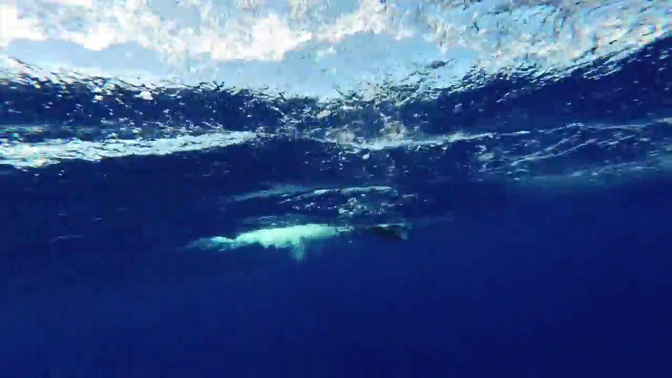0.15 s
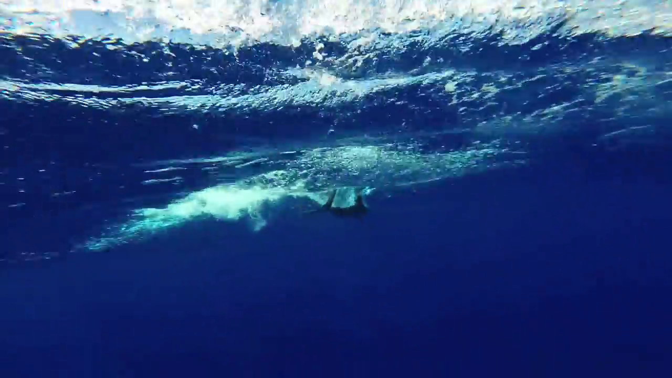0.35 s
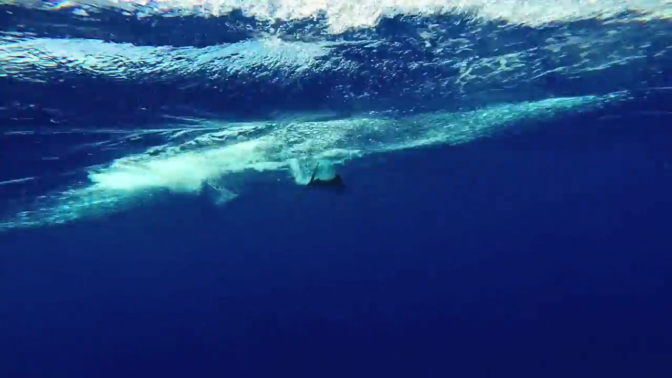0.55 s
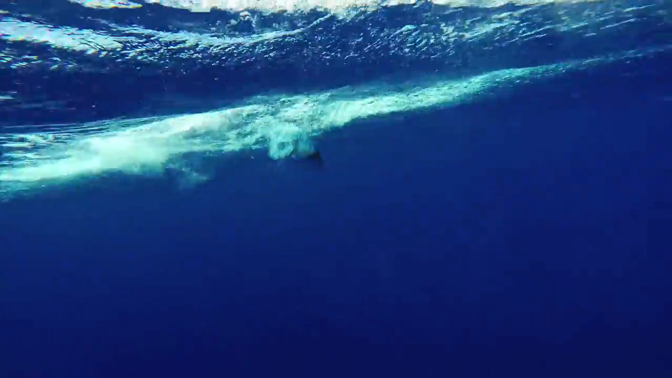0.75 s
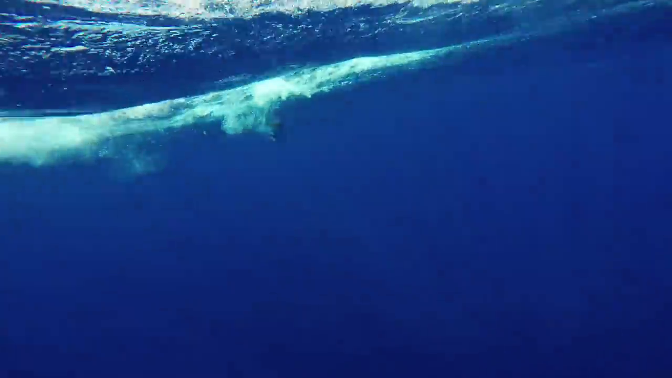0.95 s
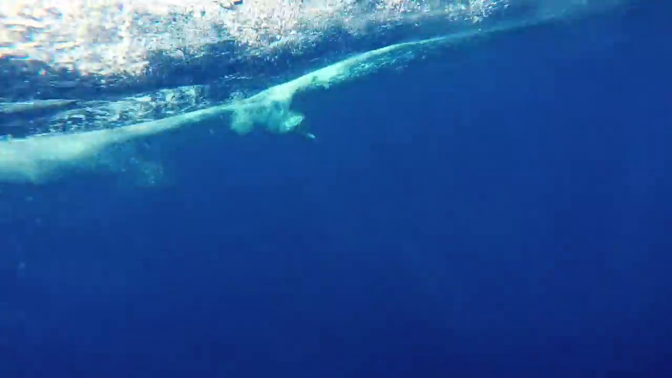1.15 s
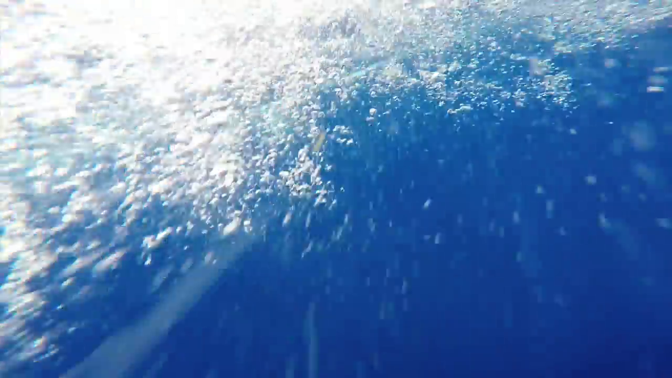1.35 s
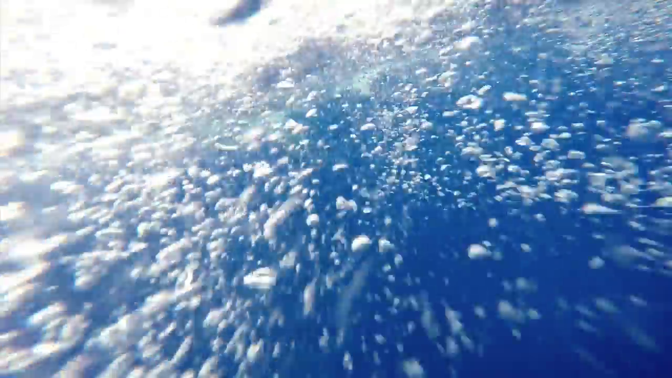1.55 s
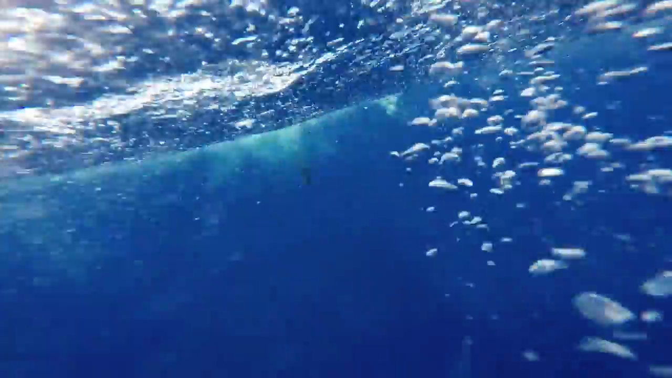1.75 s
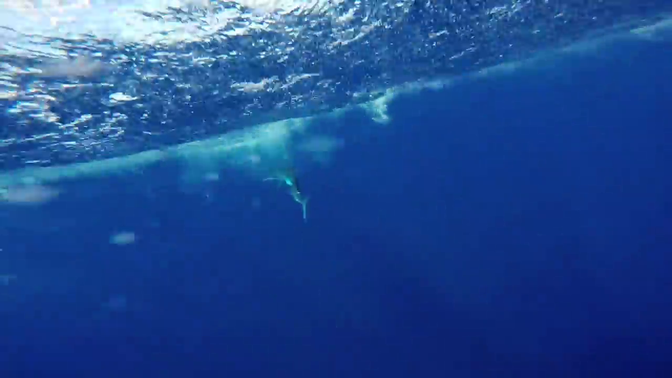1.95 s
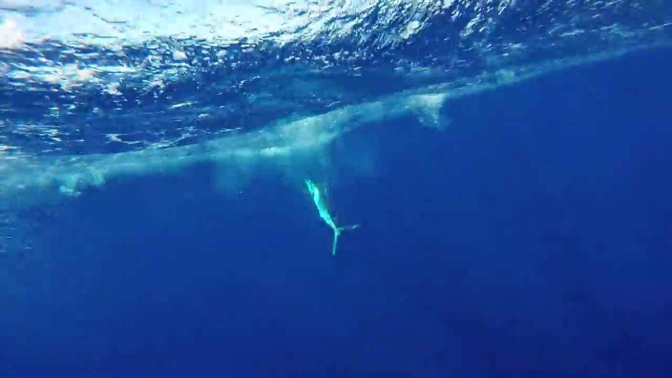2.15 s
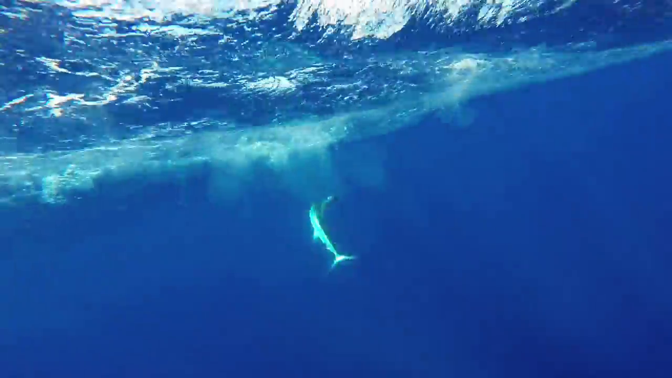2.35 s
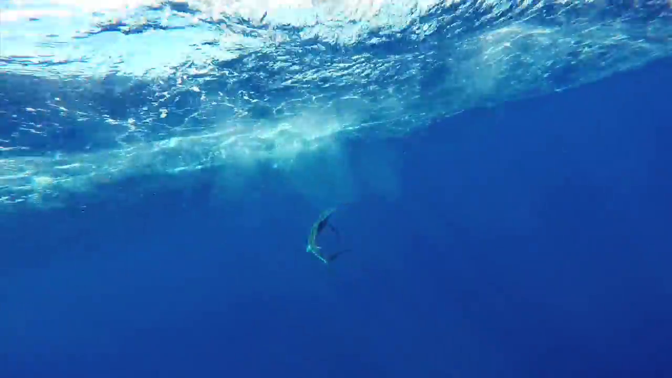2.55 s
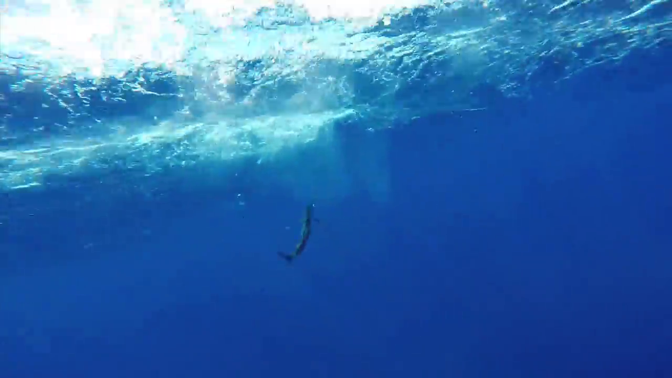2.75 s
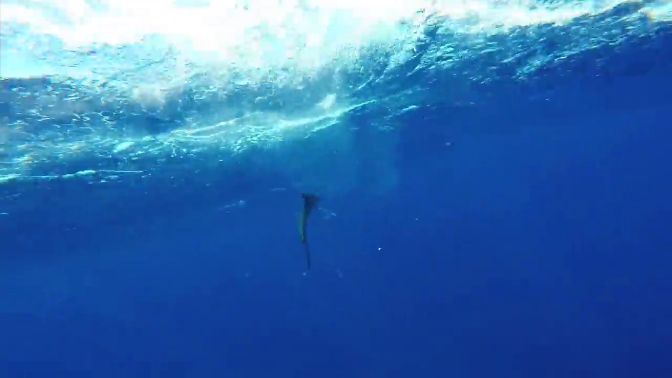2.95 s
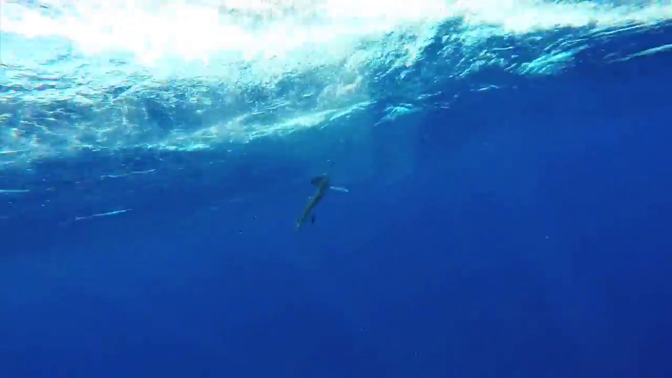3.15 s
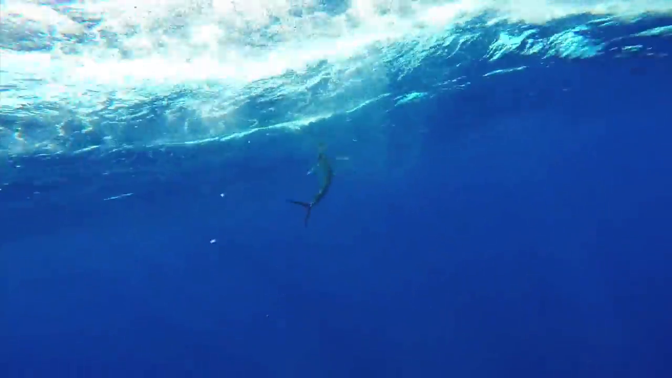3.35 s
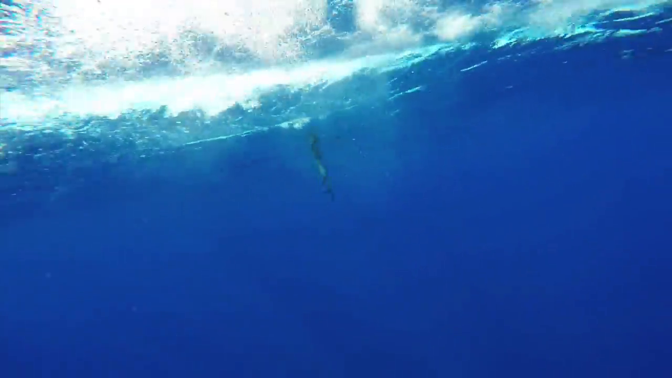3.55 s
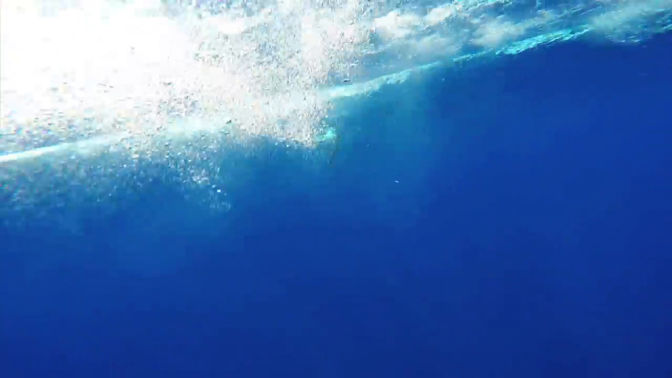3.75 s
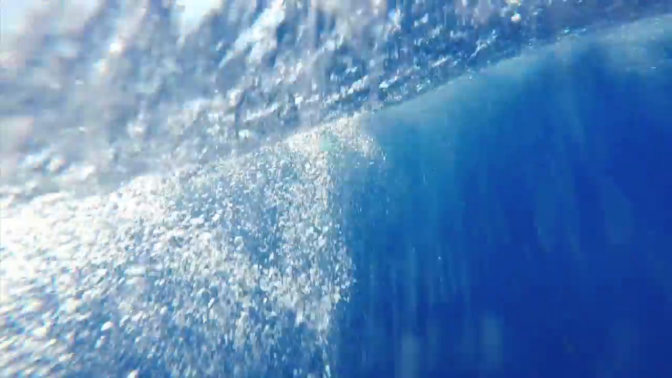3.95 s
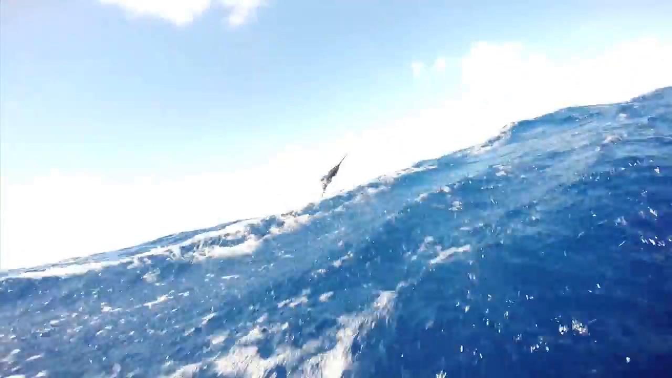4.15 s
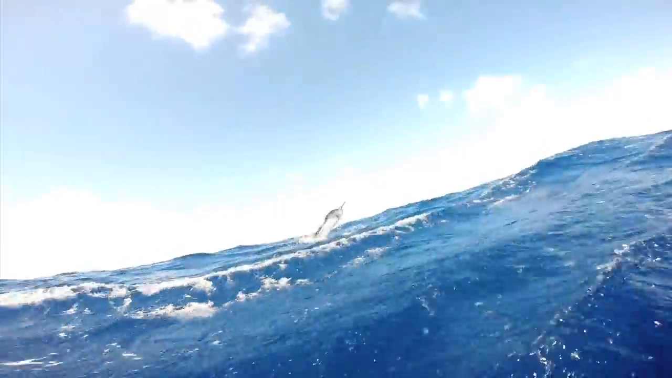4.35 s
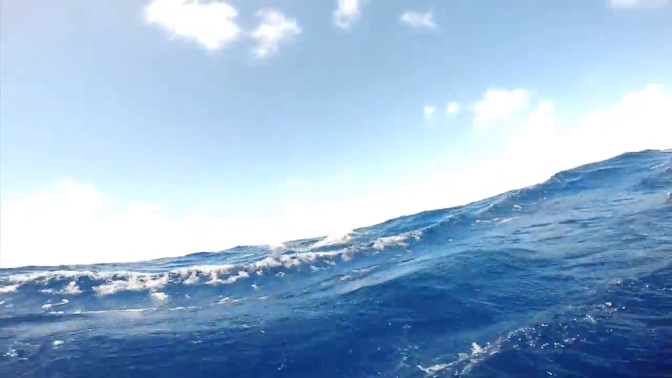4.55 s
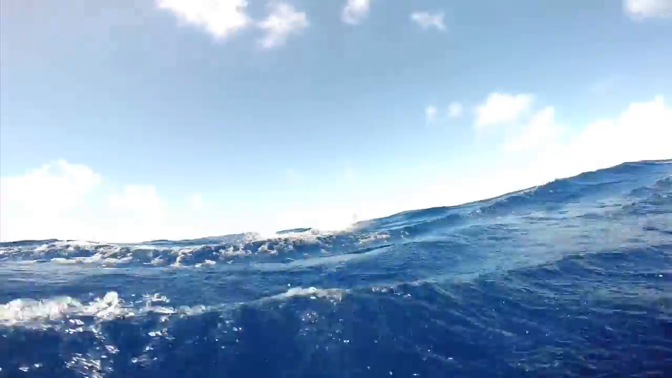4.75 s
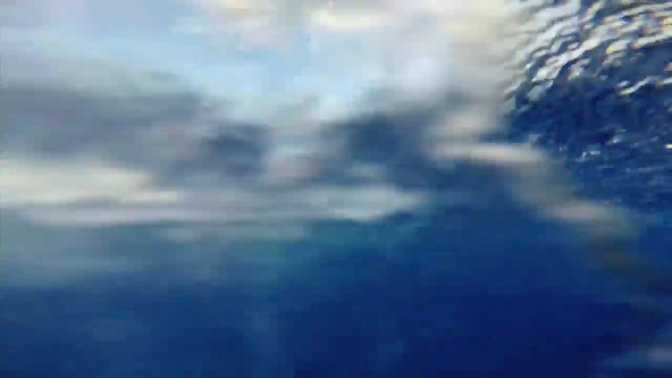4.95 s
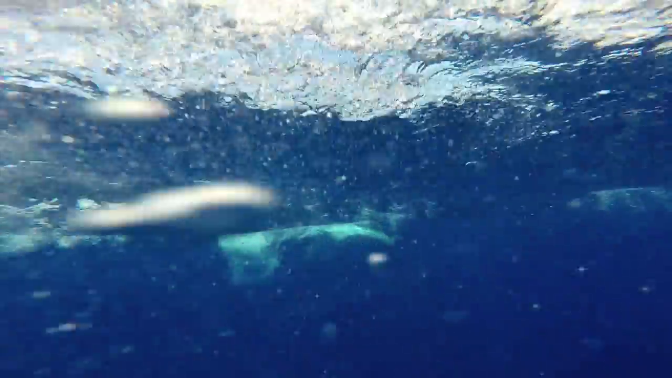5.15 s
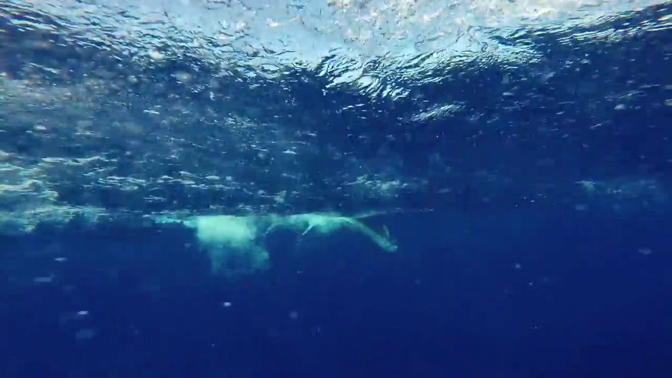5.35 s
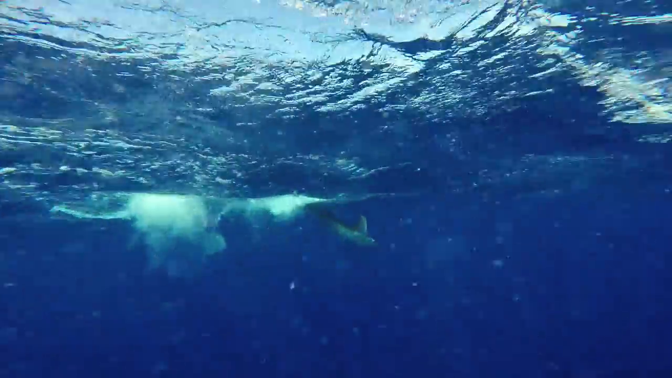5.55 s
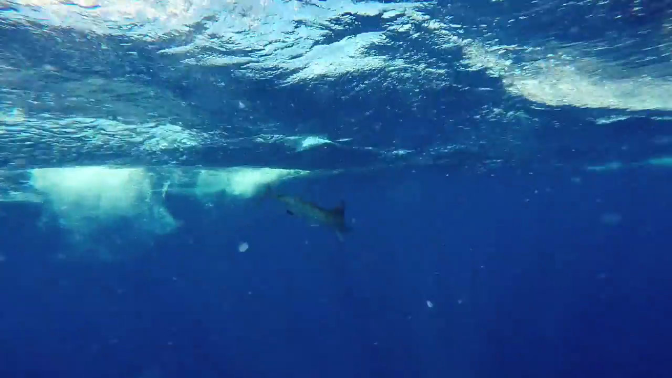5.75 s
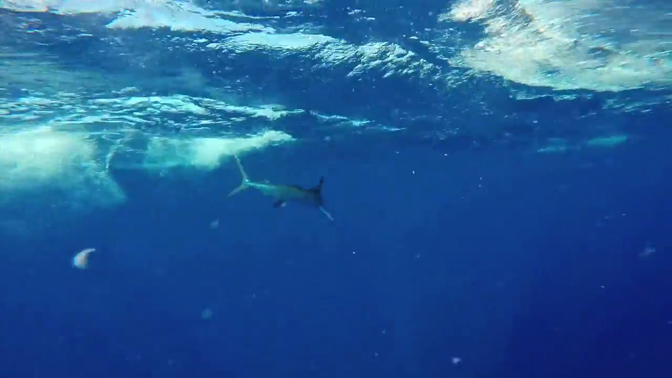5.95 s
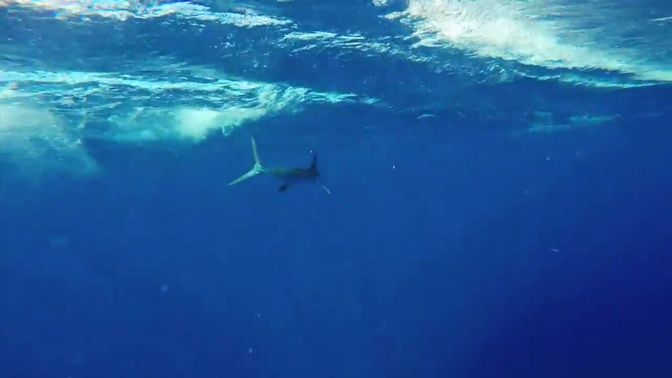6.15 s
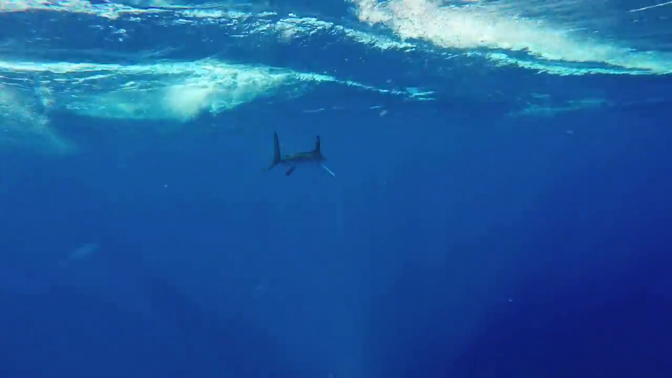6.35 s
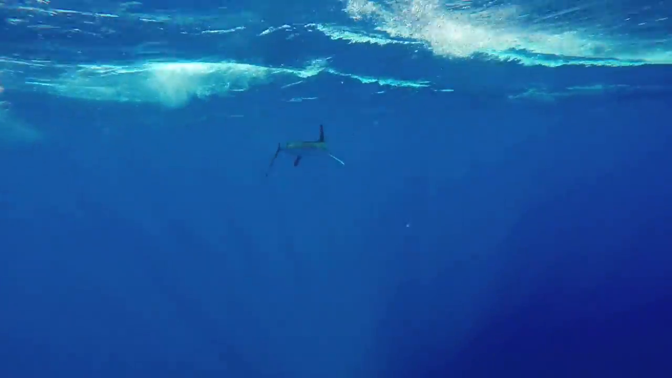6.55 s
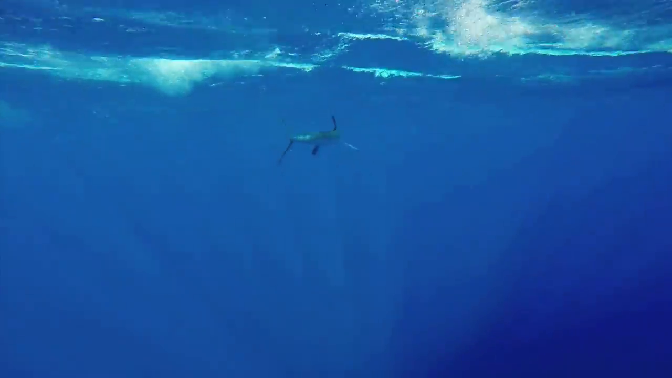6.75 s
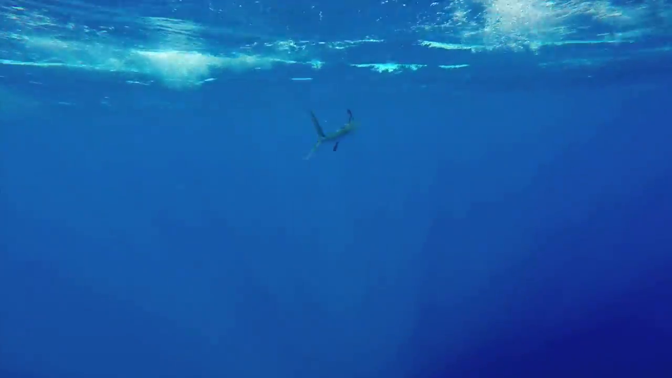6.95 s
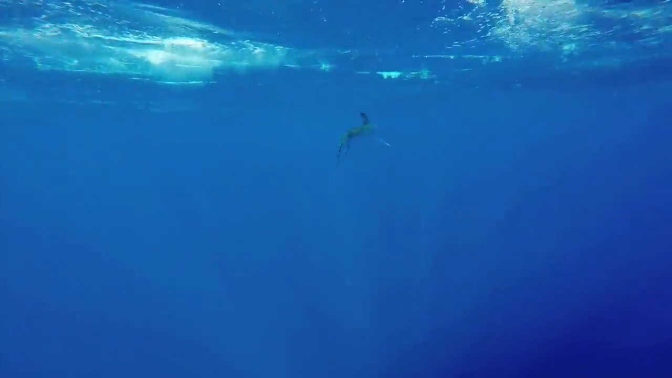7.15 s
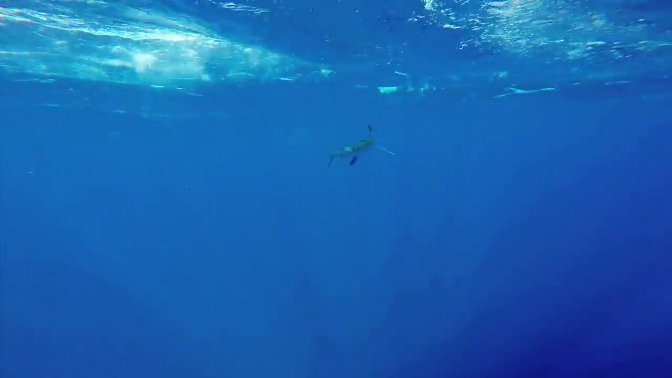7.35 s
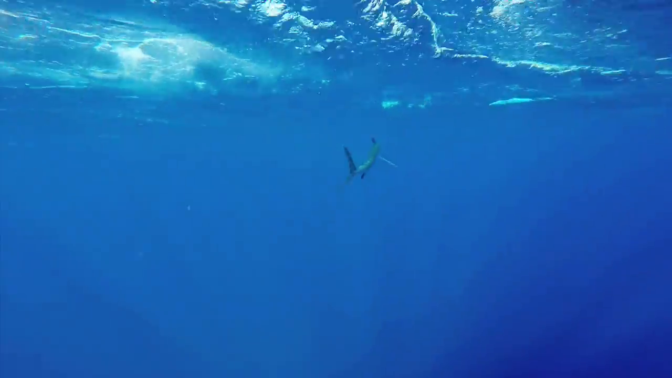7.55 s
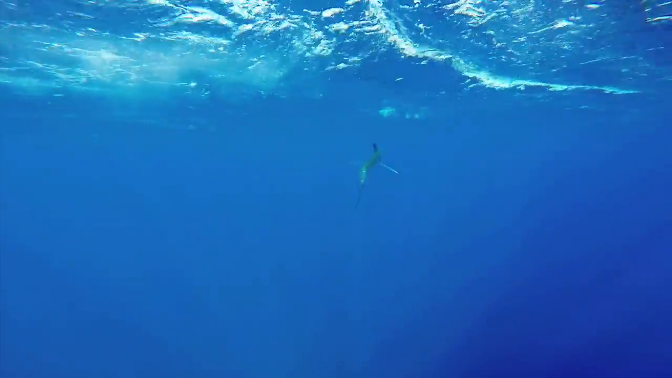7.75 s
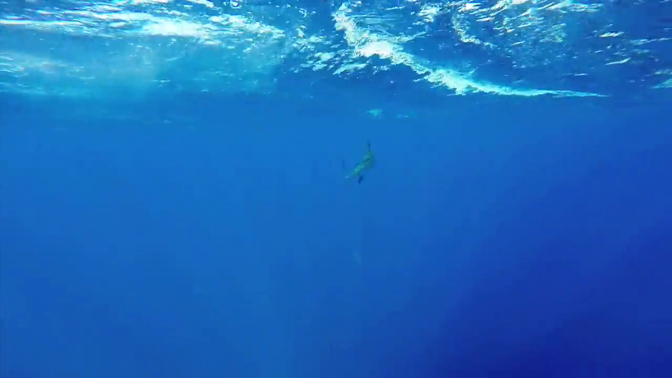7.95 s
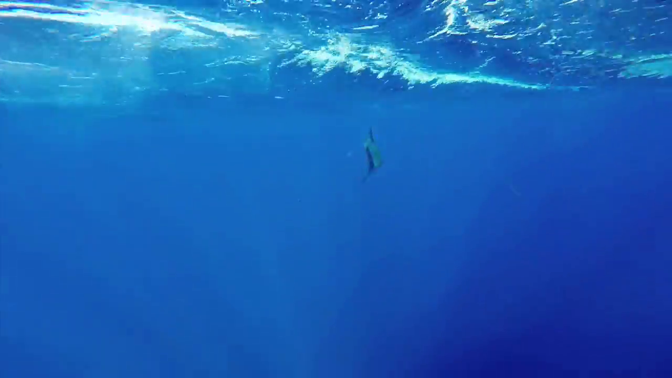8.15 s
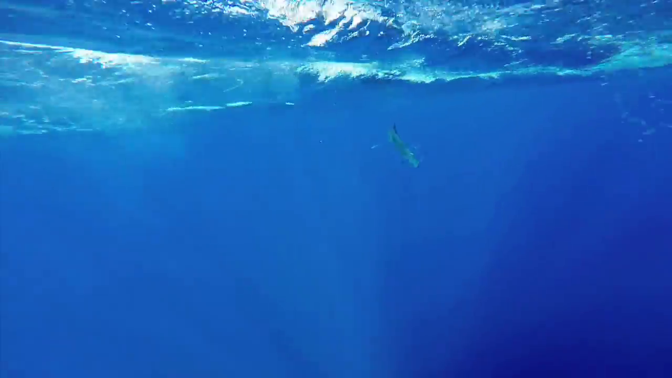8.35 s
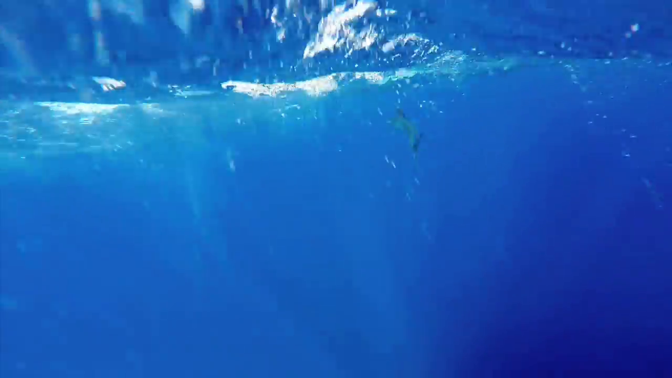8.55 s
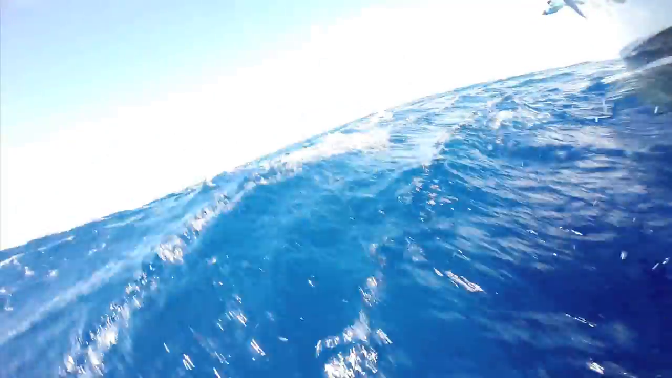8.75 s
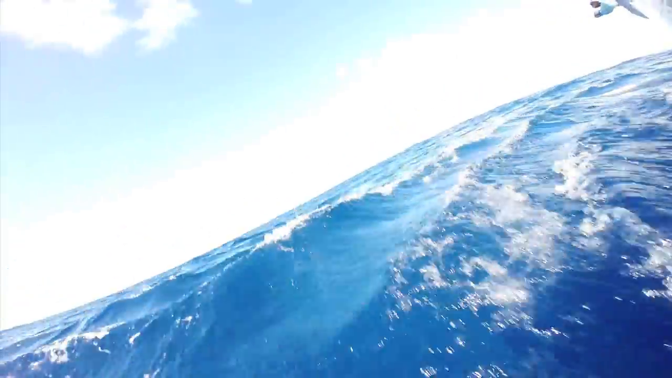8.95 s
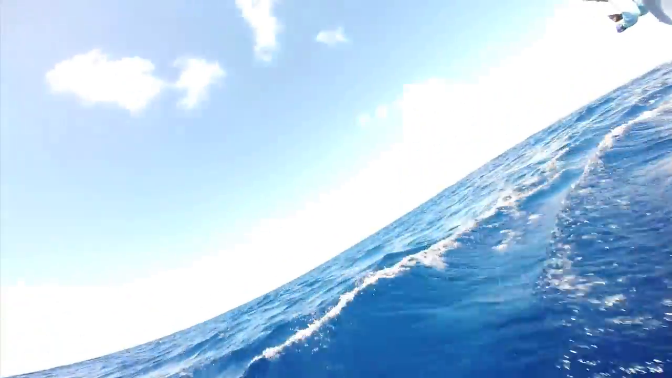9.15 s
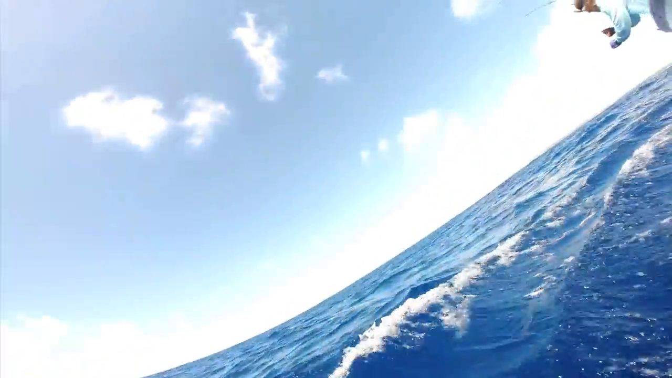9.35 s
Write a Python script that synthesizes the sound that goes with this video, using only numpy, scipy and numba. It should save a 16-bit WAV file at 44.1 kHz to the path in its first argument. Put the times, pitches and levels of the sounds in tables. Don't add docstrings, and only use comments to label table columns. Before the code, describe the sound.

Bubbly seawater churns close against a sealed housing, a hard plunge thumps, a long muffled rush builds, then a snap leaves faint wind.

```python
import sys
import numpy as np
from scipy import signal
from scipy.fft import rfft, irfft, next_fast_len
from scipy.io import wavfile
from scipy.ndimage import uniform_filter1d
from numba import njit

SR = 44100
rng = np.random.default_rng(int(sys.argv[2]) if len(sys.argv) > 2 else 0)


def transcribe(u):
    v = np.clip(np.atleast_2d(u).T, -1, 1)
    q = np.round(v * 32767).astype(np.int16)
    wavfile.write(sys.argv[1], SR, q)


def makeup_ratio(level_db):
    decades = np.asarray(level_db, float) / 20
    return 10 ** decades


N = 415422
TIME = np.arange(N) / SR
SLOW_TIME = TIME[::64]


def curve(table):
    s, *columns = np.transpose(table)
    return [np.interp(SLOW_TIME, s, c) for c in columns]


def full(slow):
    return np.interp(TIME, SLOW_TIME, slow)


def walk(rate):
    size, hold = len(SLOW_TIME), max(int(SR / 64 / rate), 1)
    steps = np.repeat(rng.standard_normal(size), hold)[:size]
    return 1.585 * uniform_filter1d(uniform_filter1d(steps, hold), hold)


def colour(table, hz):
    f, db = np.transpose(table)
    return np.interp(np.log(hz), np.log(f), db)


@njit
def ring(start, hz, size, t60, rise, swell):
    out = np.zeros(N)
    for k in range(len(hz)):
        n = int(t60[k] * SR) + 2
        phase, gain, fade, shut = 0., size[k], 1000 ** (-1 / n), 1.
        close = np.exp(-1 / (swell * n))
        for i in range(min(n, N - start[k])):
            phase += 2 * np.pi * hz[k] * (1 + rise * i / n) / SR
            shut *= close
            out[start[k] + i] += gain * (1 - shut) ** 2 * np.sin(phase)
            gain *= fade
    return out


def hits(table, lift_db, t60, rise, swell):
    s, db, hz = np.transpose(table)[:3]
    late, twin = rng.random((len(s), 2)).T
    first = ring((s * SR).astype(int), hz, makeup_ratio(db + lift_db), t60, rise, swell)
    twin_start = ((s + 0.00069 * late) * SR).astype(int)
    twin_hz = hz * (1.06 + 0.22 * twin)
    return first + ring(twin_start, twin_hz, makeup_ratio(db + lift_db - 13.5), 1.26 * t60, rise, swell)


BAND_EDGES = [25, 150, 900, 2400, 9000]


def lifted(table, levels_db, hz):
    group = np.clip(np.searchsorted(BAND_EDGES, hz) - 1, 0, len(BAND_EDGES) - 2)
    centres = np.log([70, 400, 1500, 3500])
    share = np.array([np.interp(np.log(hz), centres, row) for row in np.eye(4)]).T
    db = colour(table, hz) + 10 * np.log10(hz)
    own = [10 * np.log10(np.sum(makeup_ratio(db[group == g]) ** 2)) for g in range(4)]
    return (db - share @ own)[:, None] + share @ levels_db


# time in seconds, share in air 0-1.
AIR_SHARE = [(0, 0.55), (4.05, 0.41), (4.15, 1), (4.92, 0.8), (4.98, 0.04), (8.58, 0), (8.66, 1),
             (9.42, 0.48)]


def air_share():
    return curve(AIR_SHARE)[0]


# frequency in Hz, level in dB per Hz.
AIR_SPECTRUM = [(18, -61), (30, 2), (114, -2.5), (249, -24), (1170, -27), (1550, -24), (2240, -30),
                (5300, -43), (13000, -61), (15500, -76)]
WIND_LEVELS = [-47.5, -54, -55, -52.5]


def wind_power(hz):
    wind_db = lifted(AIR_SPECTRUM, np.array(WIND_LEVELS)[:, None], hz)
    return makeup_ratio(wind_db) ** 2 * np.clip(air_share(), 0, 1) ** 1.74


# time in seconds, pitch in Hz, level in dB.
HULL_TONE = [(0, 116, -65), (1.9, 113, -94), (2.1, 109.3, -28), (2.8, 116.6, -37), (3.0, 115.1, -37),
             (3.5, 116.7, -39), (4.0, 115, -46), (4.8, 114.8, -51.5), (6.2, 113.7, -42.5),
             (8.6, 109.6, -45), (9.42, 112.2, -45)]


def hull():
    hz, db = curve(HULL_TONE)
    phase = 2 * np.pi * np.cumsum(full(hz * (1 + .055 * walk(18)))) / SR
    return np.sin(phase) * full(makeup_ratio(db + 4 * walk(14) - 2))


# time in seconds, level in dB, build in seconds, recovery in seconds.
FILM_POPS = [
    (1.8365, 0, .0005, .0005),
    (8.5755, -1, 0.0021, 0.0011),
    (8.5903, 2.5, 0.00089, 0.0005),
    (8.605, -23, .002, .003),
]


def pops():
    out = np.zeros(N)
    for s, db, build, recover in FILM_POPS:
        t = TIME - s
        before = .8 * np.exp(-abs(t) / build)
        after = -1.45 * np.exp(-abs(t) / recover)
        out += makeup_ratio(db) * np.where(t < 0, before, after)
    return uniform_filter1d(uniform_filter1d(out, size=24), size=24)


# time in seconds, peak in dB.
FILM_CRACKS = [(0.0423, -44), (0.0598, -41), (0.0952, -40), (1.1443, -41), (1.1697, -38), (1.4641, -42),
               (1.4835, -44), (1.4955, -36), (1.5264, -38), (1.5394, -33), (1.6217, -44), (1.6591, -29),
               (1.6781, -40), (1.6931, -37), (1.716, -44), (1.729, -34), (1.7848, -33), (1.8033, -31),
               (1.8347, -37), (1.8542, -39), (2.0527, -38), (3.7758, -46), (4.0193, -41), (4.0657, -28),
               (4.0876, -23), (4.1734, -46), (4.8748, -43), (4.8798, -20), (4.8948, -15), (4.9437, -33),
               (5.006, -28), (5.0429, -40), (5.0893, -47), (6.6214, -38), (8.6512, -43), (8.6727, -34),
               (8.6946, -41), (8.7161, -28)]


def cracks():
    s, db = np.repeat(np.array(FILM_CRACKS), 3, axis=0).T
    hz = 6800 + 1900 * (np.arange(len(s)) % 3 + rng.random(len(s)))
    size = makeup_ratio(np.minimum(db, -22) + 3.5 - (hz - 6800) / 700)
    return ring((s * SR).astype(int), hz, size, np.full(len(s), .0035), 0.05, 0.03)


# time in seconds, peak in dB, pitch in Hz.
SNAP_EVENTS = [(0.0598, -37, 5370), (0.0752, -30.5, 5200), (0.169, -43, 5000), (0.9068, -36, 5800),
               (1.1697, -36, 5900), (1.484, -37, 6540), (1.6591, -35, 6560), (1.6931, -37, 7100),
               (1.8542, -37, 7060), (2.0527, -41, 5140), (2.2059, -33.5, 5140), (3.7758, -45, 5300),
               (3.9903, -42.5, 5170), (4.019, -38, 6400), (4.0317, -39, 5100), (4.0876, -23, 6800),
               (4.1135, -22.5, 6800), (4.1764, -32.5, 5260), (4.199, -46, 6600), (4.813, -45, 4960),
               (4.8963, -23, 5000), (5.0145, -23, 5130), (5.1297, -36, 4800), (5.1736, -45, 6710),
               (5.2275, -38, 4800), (8.4866, -42, 6600), (8.6512, -44, 6590), (8.6677, -35, 5900),
               (8.6777, -28, 5000), (8.721, -40, 6900), (8.7445, -40.5, 6600), (8.777, -46, 4700),
               (8.7984, -38.5, 5400)]


def snaps():
    return hits(SNAP_EVENTS, 11.3, np.full(len(SNAP_EVENTS), .005), 0.069, 0.021)


# time in seconds, peak in dB, pitch in Hz.
TICK_EVENTS = [(0.059, -30.5, 2970), (0.3326, -23.5, 2160), (0.5062, -38, 2600), (0.9268, -28, 2420),
               (1.041, -34, 3080), (1.4022, -23, 2160), (1.4208, -8, 2200), (1.6086, -19, 2420),
               (1.729, -22, 2660), (1.7417, -19, 3560), (1.7853, -19, 2460), (1.8168, -19.5, 3300),
               (2.023, -18, 2440), (2.0745, -21.5, 2700), (2.1034, -22, 2440), (2.2059, -22.5, 2900),
               (2.257, -24, 2990), (4.0275, -25, 3720), (4.042, -10.5, 2480), (4.0617, -9.5, 3140),
               (4.3134, -27.5, 2400), (4.8833, -12, 2380), (4.9025, -6, 2630), (5.0998, -22.5, 2380),
               (5.1453, -27.5, 3430), (5.1737, -28.5, 2990), (5.2277, -24.5, 3540), (8.3794, -19, 2442),
               (8.663, -24.5, 3100)]


def ticks():
    return hits(TICK_EVENTS, 6.3, np.full(len(TICK_EVENTS), .011), 0.11, 0.016)


# time in seconds, peak in dB, pitch in Hz.
SPRAY_EVENTS = [(0.087, -29, 2600), (0.097, -28, 2500), (0.194, -40, 3600), (0.614, -37, 3520),
                (0.8395, -37, 2890), (1.0544, -36, 2450), (1.1278, -31, 3230), (1.1717, -18, 2070),
                (1.3214, -25, 2030), (1.5144, -17, 2160), (1.6531, -24, 2040), (1.6911, -25, 2400),
                (1.8294, -22, 3430), (1.8544, -25, 2410), (1.9116, -28, 2190), (1.9594, -26, 2150),
                (1.9974, -25, 2130), (2.0527, -18, 2400), (2.136, -29, 2000), (2.2258, -29, 2420),
                (2.3044, -36, 2060), (4.1144, -22, 2140), (4.1979, -25, 2190), (5.1124, -25, 2120),
                (5.1594, -24, 2470), (5.2415, -33, 4200), (5.2849, -34, 2030), (5.3203, -40, 2070),
                (8.6433, -21, 2050), (8.6774, -23, 2110), (8.6964, -27, 2220), (8.8333, -37, 2140)]


def spray():
    return hits(SPRAY_EVENTS, 4.5, np.full(len(SPRAY_EVENTS), .014), 0.05, 0.02)


# time in seconds, peak in dB, pitch in Hz, decay by 60 dB in seconds.
AIR_POCKETS = [
    (0.655, -11.5, 360, 0.047),
    (1.545, -4, 80.7, 0.022),
    (1.704, -7.5, 288, 0.072),
    (1.833, -12, 204, 0.03),
    (5.012, -6, 572, 0.023),
    (5.0232, 0, 175, 0.045),
    (5.152, -21, 347, 0.059),
]


def thumps():
    t60 = np.clip(np.array(AIR_POCKETS)[:, 3], .004, .2)
    return hits(AIR_POCKETS, 3.7, t60, -0.082, 0.028)


# time in seconds, peak in dB, pitch in Hz.
GULP_EVENTS = [(5.593, -20, 315), (5.672, -18, 350), (5.741, -14, 455), (5.793, -15, 355),
               (5.847, -13, 310), (5.875, -13, 358), (5.921, -16, 366), (5.975, -14, 396), (6.0, -12, 334),
               (6.05, -15, 256), (6.083, -13, 401), (6.118, -12, 205), (6.13, -11, 369), (6.177, -14, 390),
               (6.27, -8, 361), (6.3, -10, 388), (6.408, -8, 318), (6.455, -10, 200), (6.48, -10, 614),
               (6.747, -4, 385), (6.798, -5, 633), (6.879, -8, 514), (6.961, -5, 724), (7.208, -5, 304),
               (7.274, -5, 506), (7.327, -4, 355), (7.386, -3, 301), (7.437, -7, 495), (7.506, -4, 503),
               (7.645, -5, 326), (7.818, -7, 684), (7.87, -4, 345), (7.902, -6, 334), (8.242, -7, 861),
               (8.29, -10, 350), (8.333, -9, 353)]


def gulps():
    return hits(GULP_EVENTS, 1.5, 26 / np.array(GULP_EVENTS)[:, 2], 0.08, 0.03)


# time in seconds, peak in dB, pitch in Hz.
WALL_BUBBLES = [(0.080, -17, 1500), (0.169, -25, 1700), (0.3521, -33, 1620), (0.5472, -27, 1250),
                (0.5694, -21, 1310), (0.6479, -25, 1530), (0.6908, -25, 1280), (0.7317, -21, 1100),
                (0.8111, -23, 1610), (0.847, -25, 1290), (0.9068, -26, 1250), (1.1164, -18, 1420),
                (1.3209, -13, 993), (1.5094, -7, 1140), (1.5898, -12, 1130), (1.7175, -14, 1070),
                (1.734, -12, 1480), (1.8906, -19, 1320), (1.936, -18, 1550), (1.9899, -17, 1570),
                (2.1234, -17, 1550), (2.139, -16, 1360), (2.1765, -14, 1400), (2.2244, -21, 1500),
                (2.2887, -19, 1420), (2.3351, -20, 1490), (2.3794, -31, 1410), (2.4982, -29, 1310),
                (3.7199, -30, 1070), (3.9165, -26, 1310), (3.9544, -23, 1100), (3.9868, -22, 1580),
                (4.0073, -20, 1620), (4.0744, -12, 1390), (4.0946, -9, 1170), (4.1144, -13, 1410),
                (4.1639, -25, 1350), (4.2622, -35, 1520), (4.2817, -33, 1540), (5.0454, -21, 1320),
                (5.0694, -20, 1620), (5.1078, -23, 1600), (5.1677, -25, 1170), (5.1896, -22, 1300),
                (5.2264, -30, 1390), (5.2754, -28, 1120), (5.451, -32, 1060), (5.8865, -20, 1590),
                (6.0871, -22, 1640), (8.6794, -24, 1340), (8.7294, -31, 1320), (8.759, -33, 1010)]


def bubbles():
    return hits(WALL_BUBBLES, 2.5, 34 / np.array(WALL_BUBBLES)[:, 2], 0.04, 0.03)


# time in seconds, peak in dB, pitch in Hz.
PING_EVENTS = [(0.02, -19.5, 1280), (0.228, -9.5, 1355), (0.265, -16.5, 1390), (0.335, -27, 900),
               (0.483, -16, 1286), (1.14, -17, 1490), (1.192, -5.5, 1440), (1.246, -17.5, 1520),
               (1.285, -16, 1580), (1.354, -11, 1210), (1.379, -5.5, 1030), (1.419, -11, 1090),
               (1.447, -8.5, 1150), (1.48, -4.5, 996), (1.764, -9, 1124), (1.836, -17, 820),
               (2.022, -13.5, 1040), (2.052, -13.5, 1410), (2.545, -18.5, 1360), (3.776, -16.5, 1370),
               (3.817, -11.5, 1360), (4.045, -9, 1400), (4.198, -16, 1500), (4.876, -2.5, 2060),
               (4.912, 0, 1150), (5.413, -19.5, 2030), (6.204, -9.5, 1290), (6.799, -13, 802),
               (7.247, -9, 875), (8.628, -18, 1066),
               (.4105, -28, 1310), (.59, -16.5, 1280), (.77, -20, 1200), (1.152, -15, 1520),
               (1.166, -10, 1380), (2.189, -14, 1410), (2.87, -34, 1400), (3.6675, -24, 1154),
               (3.667, -34, 3200), (3.93, -21, 850), (4.241, -25, 1560), (4.982, -13.5, 2260),
               (8.663, -17, 1490), (8.708, -18, 1470)]


def pings():
    events = PING_EVENTS
    return hits(events, 4.0, 29.8 / np.array(events)[:, 2], 0.034, 0.027)


# crest in seconds, level in dB, build and
# fade in seconds per 20 dB (a negative fade stops at once), centre in Hz.
BREAKING_WATER = [(.08, -29, 0.18, 0.26, 1190), (.165, -38, 0.17, -0.02, 2300),
                  (.075, -51, 0.028, 0.2, 4960), (.58, -32.5, 0.38, .15, 1290), (.8, -32, 0.26, 0.3, 1270),
                  (.92, -49, .15, 0.4, 5000), (1.179, -20.5, 0.1, 0.12, 1430),
                  (1.421, -16, 0.32, 0.43, 1092), (1.27, -28.5, 0.12, 0.5, 553), (1.52, -16, 0.28, .2, 488),
                  (1.53, -53, 0.11, 0.9, 5960), (1.72, -19.5, 0.033, 0.35, 296),
                  (1.78, -21, 0.27, 0.27, 1020), (1.801, -37, 0.12, -0.14, 5000),
                  (2.05, -25, 0.16, 0.03, 1360), (2.24, -29.5, 0.42, 0.36, 1400), (2.8, -44, .5, .9, 750),
                  (3.82, -30.5, 0.2, .25, 600), (3.96, -32.5, 0.3, 0.25, 850),
                  (4.05, -19, 0.016, 0.16, 1570), (4.098, -22.5, 0.18, 0.07, 1500),
                  (4.088, -32, 0.06, 0.055, 5300), (1.51, -27, .2, .13, 2100), (3.84, -45, .2, .25, 2600),
                  (4.068, -26, .025, .08, 2900), (4.18, -40, .05, 0.53, 1900),
                  (4.88, -8, 0.0095, 0.08, 1600), (4.908, -7, 0.018, 0.018, 1350),
           (4.906, -12.5, 0.017, 0.016, 5200), (4.9, -20, 0.025, 0.13, 166), (4.89, -22.5, .02, .12, 650),
           (5.01, -24.5, 0.066, 0.25, 1120), (5.01, -33, 0.13, 0.097, 4200), (5.11, -34, 0.079, 0.16, 2300),
           (5.2, -38, 0.12, .6, 1130), (5.62, -27, 0.04, 0.019, 430), (5.16, -36.5, .03, 0.076, 300),
           (5.47, -32, 0.22, 0.25, 580), (5.88, -26, 0.45, 0.55, 382), (8.54, -29, 0.16, 0.17, 920),
           (8.8, -45.5, .05, 0.44, 1470), (8.37, -18.5, 0.45, 0.26, 1060), (8.64, -27.5, .03, 0.058, 1460),
           (8.7, -29.5, .12, .12, 1730), (8.67, -41.5, 0.025, 0.083, 3600), (8.72, -46, .03, .02, 11000)]
# crest in seconds, level in dB, build and fade in seconds
# per 20 dB, centre in Hz.
SWELLS = [
    (.5, -36.5, .6, 1.5, 80),
    (3.3, -40, 3.9, 2.5, 140),
    (8.3, -34, 1.5, .5, 30),
    (1.18, -26, .06, .1, 100),
    (1.55, -26, 0.21, .2, 80),
    (1.97, -24, 0.28, .3, 114),
    (2.45, -38.5, .2, 0.39, 100),
    (4.05, -27.5, 0.18, 0.12, 69.5),
    (5.0, -26, .04, .07, 110),
    (8.58, -35, .05, 0.22, 70),
]
# fall below and above the centre in dB per octave,
# level at the centre in dB.
SPECTRAL_SLOPES = [
    (5.5, 9.5, -5.5),
    (15.7, 13.8, -3),
    (4.5, 11.8, -3),
]


def breaking_power(hz):
    power, t = 0, SLOW_TIME
    for s, db, build, fade, centre_hz in BREAKING_WATER + SWELLS:
        octaves = np.log2(hz / centre_hz)
        below_db, above_db, top_db = SPECTRAL_SLOPES[np.searchsorted([250, 3000], centre_hz)]
        shape_db = np.where(octaves < 0, below_db * octaves, -above_db * octaves)
        shape_db = shape_db + top_db - 15 * (hz > 14000)
        crest_db = db - 20 * np.where(t < s, (s - t) / max(build, 1e-3), (t - s) / max(fade, 1e-3))
        power = power + makeup_ratio(np.add.outer(shape_db, crest_db)) ** 2
    return power


# centre in Hz, width in Hz, gain in dB.
WALL_MODES = [(385, 180, 2), (635, 34, 3), (1520, 500, 5.5), (1160, 360, -10), (2290, 130, -7),
              (2520, 110, 1.5), (3090, 444, -7), (4280, 350, -13), (5820, 600, -18), (8400, 700, -10),
              (10000, 450, -9), (11700, 300, -11), (12300, 1900, 3.5), (15300, 1000, -43)]


def housing(x):
    size = next_fast_len(N)
    f = np.fft.rfftfreq(size, 1 / SR)
    modes_db = sum(db / (1 + (2 * (f - hz) / width) ** 2) for hz, width, db in WALL_MODES)
    through_walls = irfft(rfft(x, size) * makeup_ratio(modes_db + 1.5), size)[:N]
    up = full(air_share())
    return (1 - up) * through_walls + up * x


# time in seconds, rush in dB, fineness of the bubbles in dB.
FLOW_SPEED = [(0, -31, -6), (.35, -33.5, -16), (.7, -22, -15.5), (1.15, -22.5, -17), (1.55, -20, 0.5),
              (1.9, -17.5, -15), (2.3, -32, -2), (2.7, -33, -16), (3.6, -32, -27), (4.0, -31, 3.5),
              (5.1, -38, -9), (5.5, -35.5, -6.5), (5.95, -27.5, 2.5), (6.2, -21, -0.5), (6.7, -16, -1.5),
              (7.7, -15.2, .7), (8.3, -18, 2), (8.56, -32.5, 7.5)]
# frequency in Hz, level in dB per Hz.
WATER_SPECTRUM = [(18, -28), (30, -30), (639, -11.5), (1110, -5), (1510, -5), (2300, -15.5), (3680, -21.5),
                  (4310, -26), (4910, -27.5), (5890, -20.5), (6720, -41), (12600, -49.5), (15500, -82)]
# leaves the water in seconds, re-enters in seconds.
AIR_SPELLS = [
    (4.09, 4.875),
    (8.6, 9.6),
]


def flow_power(hz):
    rush_db, fine_db = curve(FLOW_SPEED)
    for leaves, enters in AIR_SPELLS:
        drained = np.clip((SLOW_TIME - leaves) / 0.048, 0, 1)
        rush_db = rush_db - 26.5 * drained * (SLOW_TIME < enters)
    full_db = rush_db + 16
    rumble_db = -33.5 + 1.19 * full_db
    gurgle_db = rush_db - 12 + 0.51 * fine_db
    hiss_db = rush_db - 15 + fine_db
    flow_db = lifted(WATER_SPECTRUM, np.array([rumble_db, rush_db, gurgle_db, hiss_db]), hz)
    lean = np.interp(np.log2(hz / 400), [-2, -1, 1, 2], [0, -1, 1, 0])
    flow_db += np.outer(lean, 0.1 + 0.19 * full_db)
    shoulder = np.interp(hz, [450, 600, 850, 1000], [0, 1, 1, 0])
    flow_db += np.outer(shoulder, 7 + 1.23 * np.clip(full_db, -9, -2))
    treble_octaves = np.log2(np.maximum(hz / 4000, 1))
    flow_db += np.outer(treble_octaves, 2 + 0.18 * full_db)
    return makeup_ratio(flow_db) ** 2


def level_map(hz):
    return 10 * np.log10(flow_power(hz) + wind_power(hz) + breaking_power(hz))


# time in seconds, spatter 0-1.
BROKEN_WATER = [(.18, 1), (.25, .6), (.6, 1), (1.6, .72), (2.3, 1), (2.6, .15), (3.6, .15), (4.0, .7),
                (4.3, .6), (4.4, .15), (4.86, .15), (4.87, .6), (4.93, 1), (5.35, 1), (5.6, .35), (6.6, .2),
                (8.6, .25), (8.66, .85), (8.85, .6), (9, .15), (9.42, .1)]


def broken_water():
    return curve(BROKEN_WATER)[0]


def froth(hz, db, spatter, count=20000):
    chance = rng.random((count, 5)).T
    at = (chance[0] * (len(spatter) - 1)).astype(int)
    band = (len(hz) * (.36 + .62 * chance[1] ** .7)).astype(int)
    pitch = hz[band] * 2 ** ((chance[2] - .5) / 3)
    spread_db = np.interp(np.log2(pitch / 500), [0, 2, 3, 4.5], [2.2, 3.4, 4.4, 6])
    loud_db = -spread_db * np.log(chance[3] + .02) + 5.8 + 3 * walk(60)[at]
    size = makeup_ratio(db[band, at] + loud_db) * spatter[at]
    cycles = 10 + 40 * chance[4] ** 1.5
    return ring(at * 64, pitch, size, cycles / pitch, 0.12, 0.013)


def rush(hz, db, spatter):
    size = next_fast_len(N)
    f = np.maximum(np.fft.rfftfreq(size, 1 / SR), 1)
    noise, out = rfft(rng.standard_normal(size)), 0
    surge, near = walk(80), np.array([walk(70) for _ in range(6)])
    for k, centre in enumerate(hz):
        mask = np.cos(np.pi / 2 * np.clip(3 * np.log2(f / centre), -1, 1))
        band = irfft(noise * mask, size)[:N]
        at = k / len(hz) * 5
        shared = near[int(at)] * (1 - at % 1) + near[int(at) + 1] * (at % 1)
        together = spatter * 2.8 * shared + (.5 + spatter) * surge
        flutter = together * min(centre / 500, 1) + .8 * walk(30)
        thinning = 12 * spatter * np.interp(centre, [0, 900, 6000], [0, 1, 1.1])
        out = out + band / band.std() * full(makeup_ratio(db[k] + flutter - thinning))
    return out


def scene():
    hz = 25 * 2 ** (np.arange(29) / 3)
    db, spatter = level_map(hz), broken_water()
    water = housing(rush(hz, db, spatter) + froth(hz, db, spatter))
    large = pings() + bubbles() + gulps() + thumps()
    small = spray() + ticks() + snaps() + cracks()
    return (water + large + small + pops() + hull())[None]


def low_pass(x):
    return signal.sosfilt(signal.butter(12, 15690, fs=SR, output="sos"), x)


# frequency in Hz, level in dB.
WHINE_TONES = [
    (14626, -91),
]


def record(dry):
    lowpass = signal.butter(4, 12500, fs=SR, output="sos")
    hiss = makeup_ratio(-80) * signal.sosfilt(lowpass, rng.standard_normal(N))
    whine = sum(makeup_ratio(db) * np.sin(2 * np.pi * hz * TIME) for hz, db in WHINE_TONES)
    mix = np.clip(dry + hiss + whine, -1, 1)
    return low_pass(mix)


dry = scene()
out = record(dry)
transcribe(out)
```